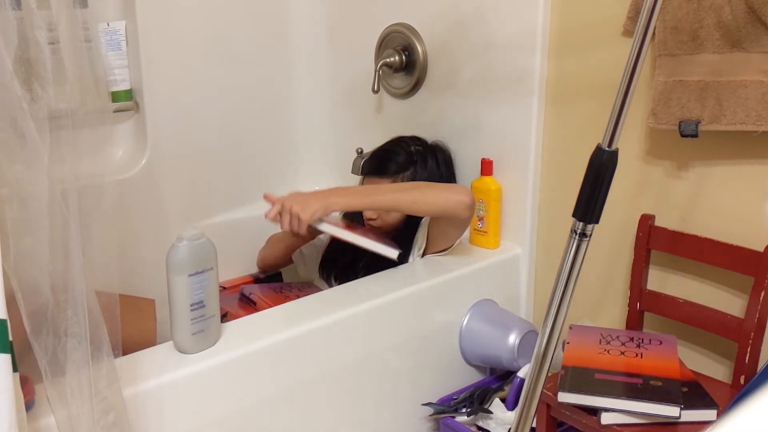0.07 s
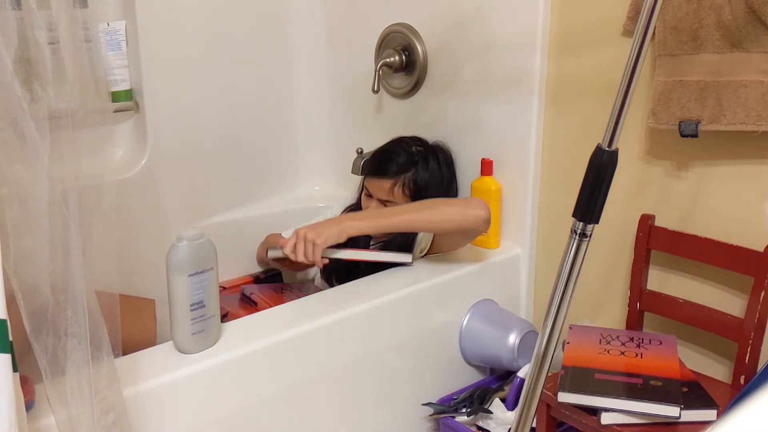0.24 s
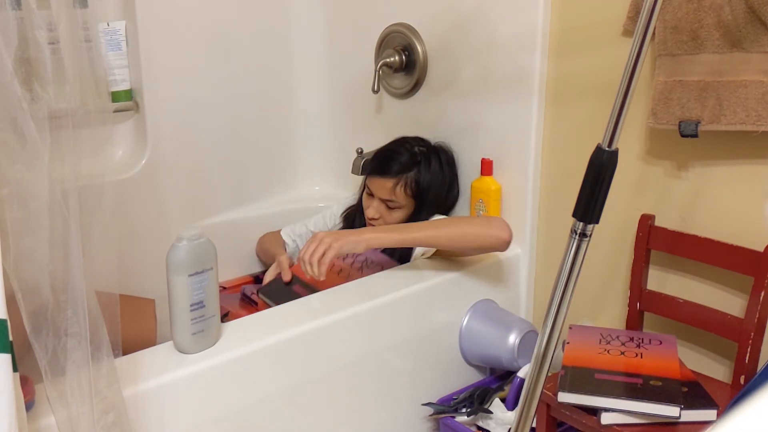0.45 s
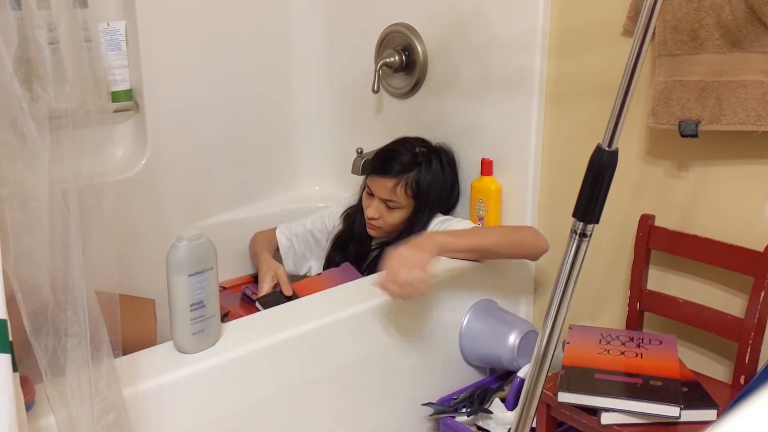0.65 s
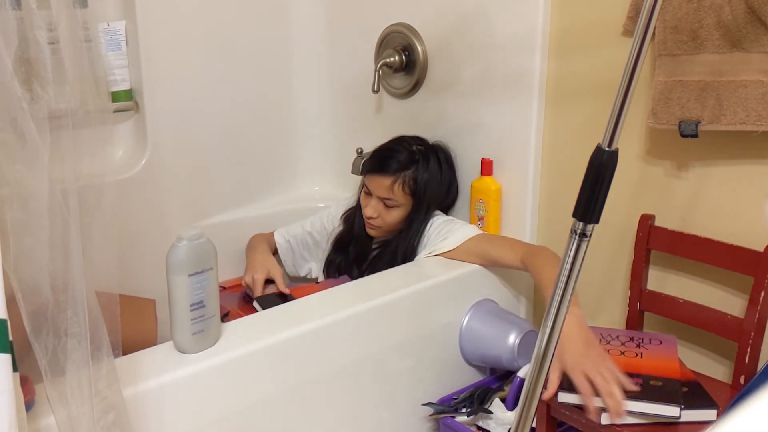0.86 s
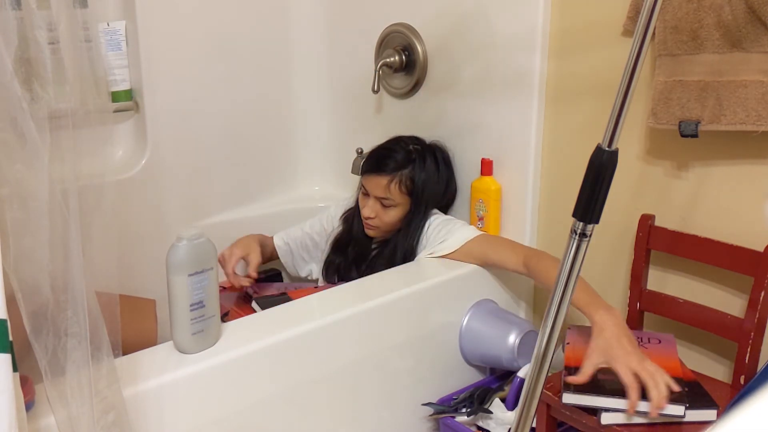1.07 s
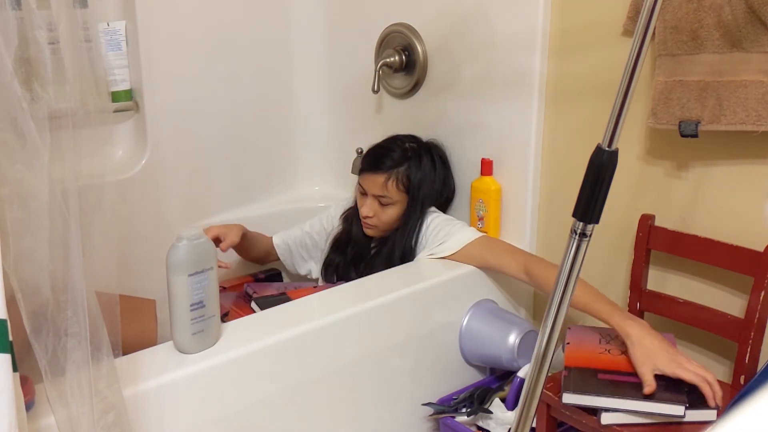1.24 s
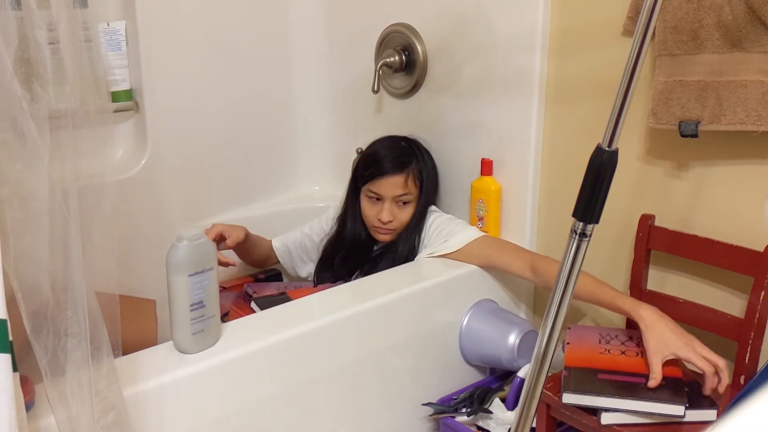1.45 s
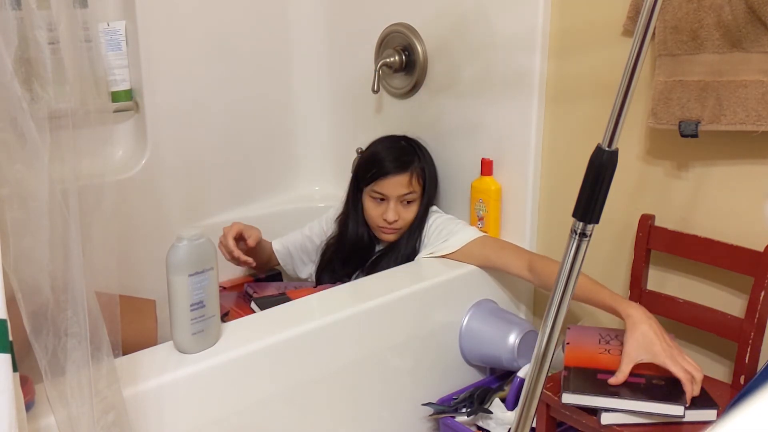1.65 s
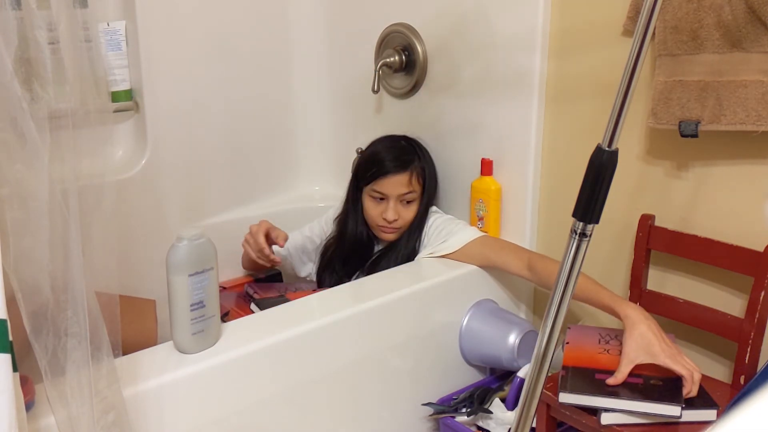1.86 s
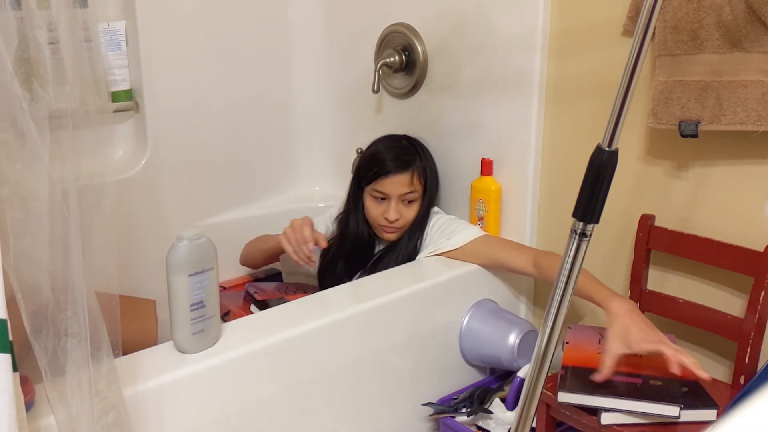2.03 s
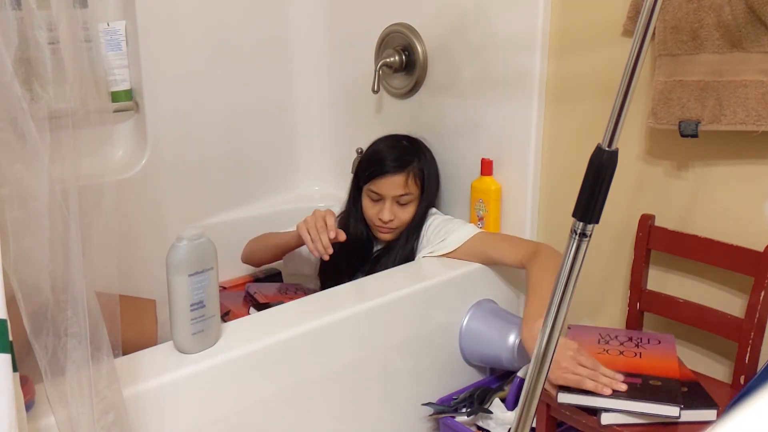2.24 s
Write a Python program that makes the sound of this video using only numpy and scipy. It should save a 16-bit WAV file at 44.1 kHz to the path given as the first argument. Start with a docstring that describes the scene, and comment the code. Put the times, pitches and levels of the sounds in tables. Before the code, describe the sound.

Books slap and thud against a hollow bathtub, then knock and slide on a wooden chair.

```python
"""Books are moved from a bathtub to a wooden chair in a small, hard-walled bathroom.
One slaps down and a second lands with a thud, each contact a quick cluster of touches.
Elbow and books bump the hollow tub, which booms and sets a metal fitting ringing.
Then a hand knocks and slides the stack on the chair, whose wood rings briefly.
Contacts and friction are heard mostly through the room, over a faint rumble and hiss."""
import sys
import numpy as np
from scipy import signal
from scipy.fft import rfft, irfft, next_fast_len
from scipy.io import wavfile
from scipy.ndimage import uniform_filter1d

SR = 44100
rng = np.random.default_rng(int(sys.argv[2]) if len(sys.argv) > 2 else 0)


def bounce(signal):
    """Save signal as a 16-bit WAV file at the path given by the first command-line argument."""
    frames = np.transpose(np.atleast_2d(signal))
    limited = np.clip(frames, -1, 1)
    pcm = np.round(limited * 32767).astype(np.int16)
    wavfile.write(sys.argv[1], SR, pcm)


N = 101429
DIRECT_DB = -12  # direct sound relative to the reverberation


def slap(facing_db=1):
    """A cover lands edge first, then flat, and settles; facing the microphones adds direct sound."""
    # Each row: start in seconds, level in dB, contact length in seconds, bass in dB.
    contacts = [(0.2215, -8, 0.0018, -13), (0.2311, -4.5, 0.004, 2), (0.242, -11.5, 0.0062, 8.5),
                (0.289, -17, 0.008, -10)]
    # Each row: frequency in Hz, level in dB.
    spectrum = [(45, -14), (80, -4.5), (130, -12.5), (205, -5), (325, 0.5), (436, -5), (550, -2),
                (950, -10), (1650, -13), (3170, -19), (5300, -24.5), (7500, -33.5), (11000, -31.5),
                (15500, -39.5)]
    return sum(blow(start_s, db, length_s, lambda hz: along(spectrum, hz) + bass_shelf(hz, bass_db),
                    DIRECT_DB + facing_db)
               for start_s, db, length_s, bass_db in contacts)


def thud():
    """A heavy book lands in three dull contacts."""
    # Each row: start in seconds, level in dB, contact length in seconds, bass in dB.
    contacts = [(0.595, -5.5, 0.0045, -3.5), (0.603, -4.5, 0.0052, -4.5), (0.617, -4.5, 0.0025, 0)]
    # Each row: frequency in Hz, level in dB.
    spectrum = [(50, -20), (130, 7), (230, -1), (550, -7.5), (800, -10.5), (1300, -18.5), (2100, -30),
                (3500, -41), (6000, -56), (15000, -62)]
    return sum(blow(start_s, db, length_s, lambda hz: along(spectrum, hz) + bass_shelf(hz, bass_db))
               for start_s, db, length_s, bass_db in contacts)


def knocks(near_db=3, treble_hz=1700, spot_width_hz=76):
    """Hand and books knock, coloured by the spot struck; the near, open stack adds direct sound."""
    # Each row: start in seconds, level in dB, contact length in seconds, bass in dB, treble in dB,
    # spot resonance in Hz, its lift in dB.
    contacts = [(0, -25, 0.0015, -11, -28.5, 480, 8.5), (0.533, -22.5, 0.0086, -20, -31, 1120, 4),
                (0.975, -18.5, 0.0013, -2, -9, 403, 6.5), (.983, -21, 0.0011, -8.5, 0, 1006, 8),
                (1.289, -26, 0.0048, 17, -12.5, 406, 8), (1.323, -28, 0.0064, -8, -13, 1010, 1),
                (1.334, -25.5, 0.0025, -7, -7.5, 1270, 5), (1.347, -24, .0015, 1, -18, 230, 11),
                (1.643, -18.5, 0.025, -3, 5.5, 300, 16), (1.678, -26.5, 0.0099, 0, 6, 860, 4),
                (2.013, -25, 0.022, -24, -4, 990, 4.5), (2.167, -27, 0.011, 7.5, -33, 355, -2),
                (2.286, -20.5, 0.011, -7, -22, 505, 9.5)]
    # Each row: frequency in Hz, level in dB.
    spectrum = [(60, -9.5), (150, -3), (260, -6), (500, -1.5), (700, -4), (1050, -3), (1500, -7),
                (2750, -9.5), (3500, -19.5), (5200, -23.5), (7500, -35.5), (11000, -31.5), (15500, -42)]
    out = np.zeros((2, N))
    for start_s, db, length_s, bass_db, treble_db, spot_hz, lift_db in contacts:
        def colour_db(hz):
            shelves_db = bass_shelf(hz, bass_db) + treble_db * hz ** 2 / (hz ** 2 + treble_hz ** 2)
            return along(spectrum, hz) + shelves_db + lift_db * resonance(hz, spot_hz, spot_width_hz)
        out += blow(start_s, db, length_s, colour_db, DIRECT_DB + near_db)
    return out


def blow(start_s, db, length_s, colour_db, direct_db=DIRECT_DB, size=8192):
    """One contact in the room: cover and pages meet in a cluster of touches, flattened then coloured."""
    t = np.arange(size) / SR
    touches = rfft(rng.standard_normal(size) * np.exp(-t / length_s))
    smooth_magnitude = np.sqrt(np.abs(uniform_filter1d(np.abs(touches) ** 2, size=33)) + 1e-12)
    taper = np.exp(-40 * (t / t[-1]) ** 2)
    cluster = irfft(touches / smooth_magnitude) * taper
    hit = signal.fftconvolve(cluster / np.linalg.norm(cluster), pulse(colour_db))
    placed = np.pad(hit, (round(start_s * SR), N))[:N]
    return room(amp(db) * placed, direct_db)


def bass_shelf(hz, bass_db, corner_hz=405):
    """Bass gain in dB: a broad contact pushes more air than an edge."""
    return bass_db / (1 + (hz / corner_hz) ** 4)


def tub(left_lag_s=0.00036):
    """Soft bumps flex the hollow tub's floor and ring its wall, which the arm damps."""
    # Each row: start in seconds, level in dB, pitch in Hz, rise in seconds, T60 in seconds.
    booms = [(0.231, -44, 57, 0.008, 0.78), (0.4604, -29.5, 48.8, 0.027, 0.34),
             (.5998, -25, 58, 0.011, 0.24), (0.681, -43, 45.7, 0.037, 0.35),
             (0.8022, -37, 43.85, 0.01, 0.43), (.978, -45.5, 70, 0.006, 0.24),
             (2.213, -47.5, 63, 0.037, 0.95)]
    # Each row: start in seconds, level in dB, rise in seconds, tilt in dB per octave, T60 factor.
    bumps = [(.225, -41, 0.031, -4, 1.48), (.604, -34.5, 0.015, 6.5, 0.2), (0.6637, -36, .0105, -2, 0.34),
             (.693, -32, 0.027, -5, 0.16), (0.7056, -32, 0.0047, -6.5, 0.48),
             (.755, -42, 0.0043, 1.5, 0.74), (.811, -32, 0.01, -9.5, 0.65), (.952, -53, 0.015, 2, 0.89),
             (2.201, -54, 0.015, -18, 0.51), (2.28, -48.5, 0.0094, -15, 1)]
    # Each row: frequency in Hz, level in dB, free T60 in seconds.
    modes = [(103.1, -10.5, 1), (136.64, 2, 0.46), (146.3, -10.5, 0.32), (230.5, -6, 0.29),
             (313.2, -10.5, 0.38), (403, -20, 0.8), (500, -27.5, 0.9)]
    pivot_hz = modes[1][0]
    floor = sum(amp(db) * ring(start_s, hz, rise_s, t60_s) for start_s, db, hz, rise_s, t60_s in booms)
    wall = np.zeros(N)
    for start_s, db, rise_s, tilt_db_oct, t60_factor in bumps:
        for hz, mode_db, t60_s in modes:
            gain = amp(db + mode_db + tilt_db_oct * np.log2(hz / pivot_hz))
            wall += gain * ring(start_s, hz, rise_s, t60_s * t60_factor)
    delays_s = left_lag_s * np.array([[0.5], [-0.5]])
    return floor + filtered(wall, lambda hz: np.exp(-2j * np.pi * hz * delays_s))


def chair(rise_s=0.0055):
    """Pushes pass through the stack and briefly ring the wooden seat and back."""
    # Each row: start in seconds, level in dB, tilt in dB per octave.
    pushes = [(1.336, -46.5, -0.5), (1.648, -49.5, 0.5)]
    # Each row: frequency in Hz, level in dB, T60 in seconds.
    modes = [(138.7, -6.5, 0.19), (227.5, -1, 0.23), (333, -8.5, 0.21), (372, -13, 0.22), (542, -9, 0.29),
             (761, -19.5, 0.73), (1140, -10, 0.2)]
    pivot_hz = modes[1][0]
    return sum(amp(db + mode_db + tilt_db_oct * np.log2(hz / pivot_hz)) * ring(start_s, hz, rise_s, t60_s)
               for start_s, db, tilt_db_oct in pushes for hz, mode_db, t60_s in modes)


def fitting(rise_s=0.0056, width_hz=70):
    """A metal fitting jarred by the bumps: a faint, rough ring of narrow noise bands."""
    # Each row: start in seconds, level in dB.
    jolts = [(0.652, -57.5), (0.713, -64.5), (.82, -79)]
    # Each row: frequency in Hz, level in dB, T60 in seconds.
    modes = [(2780, -5.5, 0.53), (3164, -2.5, 0.35), (4210, -8, 0.46), (5590, -13, 0.51),
             (8263, -18.5, 0.35)]
    out = np.zeros((2, N))
    for mode_hz, mode_db, t60_s in modes:
        band = unit(filtered(rng.standard_normal((2, N)), lambda hz: resonance(hz, mode_hz, width_hz)))
        for start_s, db in jolts:
            t = since(start_s)
            out += band * amp(db + mode_db - 60 * t / t60_s) * (1 - np.exp(-t / rise_s))
    return out


def friction():
    """Paper and sleeve brush, covers slide over each other, a glossy cover squeaks faintly."""
    # Each row: peak time in seconds, level in dB, rise in seconds, fall in seconds.
    brushes = [(.008, -63.5, 0.018, 0.035), (.43, -70.5, 0.1, 0.081), (.635, -53.5, 0.022, 0.033),
               (.79, -63.5, 0.049, 0.021), (.96, -60, 0.045, 0.099), (1.333, -58, 0.018, 0.011),
               (1.425, -66.5, 0.057, 0.036), (1.64, -64, 0.03, 0.068), (1.91, -72, 0.029, 0.047),
               (2.03, -67.5, 0.021, 0.059), (2.215, -60, 0.039, 0.03), (2.287, -56.5, 0.0092, 0.024)]
    slides = [(.09, -65.5, 0.042, 0.0053), (.43, -58.5, 0.27, 0.18), (.70, -60.5, 0.021, 0.015),
              (.83, -62.5, 0.03, 0.0085), (1.0, -58.5, 0.17, 0.073), (1.26, -63.5, 0.036, 0.034),
              (1.53, -65.5, 0.043, 0.031), (1.81, -62.5, 0.11, 0.091), (1.93, -73.5, 0.066, 0.035),
              (2.2, -66.5, 0.39, 0.11)]
    squeaks = [(.09, -65.5, 0.027, 0.012)]
    # Each row: frequency in Hz, level in dB.
    brush_spectrum = [(200, 14), (1000, 6.5), (3000, 0), (5200, 0), (7500, -10), (11000, -3.5),
                      (15500, -9.5)]
    slide_spectrum = [(100, 0), (300, 4), (550, -1), (900, 0.5), (1600, 0.5), (2500, -5.5), (3500, -15),
                      (7000, -26.5), (15000, -67)]
    squeak_spectrum = [(1200, -61), (2000, -25), (2230, -12), (2600, -28.5), (4000, -38)]
    return rub(brushes, brush_spectrum) + rub(slides, slide_spectrum) + rub(squeaks, squeak_spectrum)


def rub(strokes, spectrum, grain_db=3):
    """Grainy friction noise swells and fades with each stroke."""
    t = np.arange(N) / SR
    force = np.zeros(N)
    for peak_s, db, rise_s, fall_s in strokes:
        force += amp(db) * np.exp(-np.where(t < peak_s, ((t - peak_s) / rise_s) ** 2,
                                            (t - peak_s) / fall_s))
    roughness = unit(uniform_filter1d(rng.standard_normal(N), size=90))
    grains = amp(grain_db * roughness) * rng.standard_normal(N)
    return room(force * unit(filtered(grains, lambda hz: amp(along(spectrum, hz)))))


def room(x, direct_db=DIRECT_DB, early_db=2, early_t60_s=0.13, build_s=0.0025, pan_db=2):
    """Direct sound from slightly left, a dense flurry off the near walls, then the longer tail."""
    # Each row: frequency in Hz, T60 in seconds.
    tail_t60 = [(100, 0.24), (300, 0.5), (800, 0.53), (2000, 0.36), (5000, 0.35), (13000, 0.37)]
    size = SR * 3 // 4
    hz, t, noise = signal.stft(rng.standard_normal((2, size)), SR, nperseg=256)
    decay = amp(-60 * t / along(tail_t60, hz)[:, None]) + amp(early_db - 60 * t / early_t60_s)
    response = diffuse(signal.istft(noise * decay, SR, nperseg=256)[1])[:, :size]
    response *= 1 - np.exp(-np.arange(size) / SR / build_s)
    response /= np.linalg.norm(response[0])
    response[:, 0] += amp(direct_db + pan_db * np.array([1, -1]))
    return signal.fftconvolve(x[None], response, axes=1)[:, :N]


def diffuse(pair):
    """Two unrelated signals become a sound field: alike in the bass, apart in the treble."""
    # Each row: frequency in Hz, left-right correlation.
    correlation = [(35, 0.94), (110, 0.91), (250, 0.71), (480, 0.62), (1000, 0.041), (2000, -0.26),
                   (4000, -0.0028), (10000, -0.069)]
    angle = lambda hz: np.arccos(along(correlation, hz)) / 2
    mid, side = filtered(pair, lambda hz: np.array([np.cos(angle(hz)), np.sin(angle(hz))]))
    return np.array([mid + side, mid - side])


def air(level_db=-63):
    """The room's steady rumble and hiss."""
    # Each row: frequency in Hz, level in dB.
    spectrum = [(20, 4.5), (35, 4), (52, 2), (75, -14), (110, 0), (200, -20), (500, -21.5), (1000, -21),
                (2000, -25.5), (4000, -26.5), (7500, -34.5), (11000, -29.5), (15500, -34.5)]
    noise = diffuse(rng.standard_normal((2, N)))
    return amp(level_db) * unit(filtered(noise, lambda hz: amp(along(spectrum, hz))))


def ring(start_s, hz, rise_s, t60_s):
    """One mode swells while pushed, then dies away."""
    t = since(start_s)
    swell = np.sin(np.pi / 2 * np.minimum(t / rise_s, 1))
    decay = amp(-60 * np.maximum(t - rise_s, 0) / t60_s)
    return np.sin(2 * np.pi * hz * t) * swell * decay


def resonance(hz, centre_hz, half_width_hz):
    """Peak of height 1."""
    return 1 / (1 + ((hz - centre_hz) / half_width_hz) ** 2)


def pulse(colour_db, size=4096):
    """Minimum-phase pulse of energy 1, spectrum shaped by colour_db(hz)."""
    cepstrum = irfft(np.log(amp(colour_db(np.fft.rfftfreq(size, 1 / SR)))))
    cepstrum[1:size // 2] *= 2
    cepstrum[size // 2 + 1:] = 0
    wave = irfft(np.exp(rfft(cepstrum)))
    return wave / np.linalg.norm(wave)


def filtered(x, response):
    """Multiply the spectrum of x by response(hz)."""
    size = next_fast_len(N + SR // 4)
    return irfft(rfft(x, size) * response(np.fft.rfftfreq(size, 1 / SR)), size)[..., :N]


def along(points, hz):
    """Interpolate (Hz, value) points on a log axis."""
    point_hz, values = np.transpose(points)
    return np.interp(np.log(hz + 1), np.log(point_hz + 1), values)


def since(start_s):
    """Seconds since the start, zero before."""
    return np.maximum(np.arange(N) / SR - start_s, 0)


def amp(db):
    """Decibels to gain."""
    return 10 ** (np.asarray(db) / 20)


def unit(x):
    """Scale to rms 1."""
    return x / np.sqrt(np.mean(x ** 2) + 1e-20)


def scene():
    """Books, tub, chair and fitting over the quiet room."""
    books = friction() + slap() + thud() + knocks()
    return books + tub() + chair() + fitting() + air()


def record(dry):
    """Two microphones of unequal colour, band-limited."""
    # Each row: frequency in Hz, left minus right in dB.
    balance = [(30, -1.5), (100, 3.5), (250, 0.5), (500, 1.1), (1000, -2.5), (2000, -4.5), (4000, 2.5),
               (12000, -2)]
    top_hz = 15720
    return filtered(dry, lambda hz: amp(along(balance, hz) * np.array([[0.5], [-0.5]])) * (hz < top_hz))


dry = scene()
out = record(dry)
bounce(out)
```